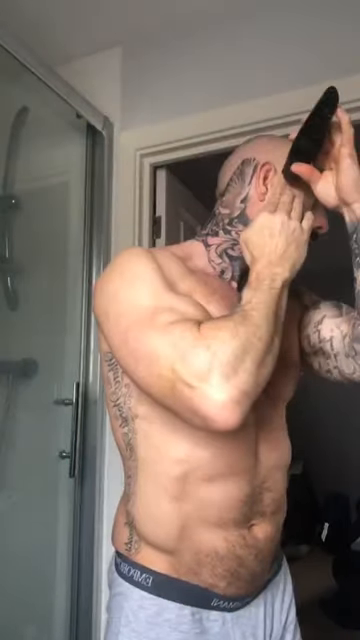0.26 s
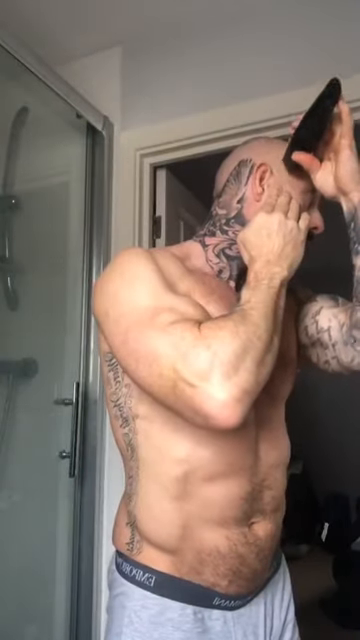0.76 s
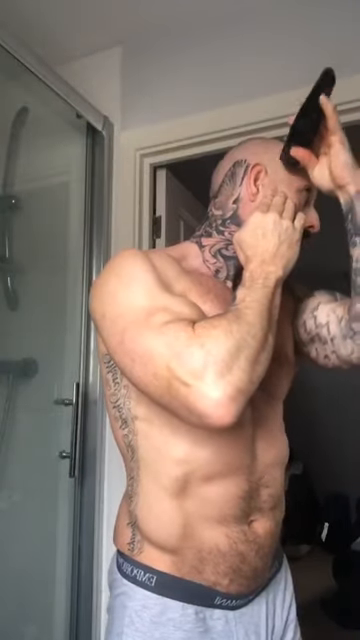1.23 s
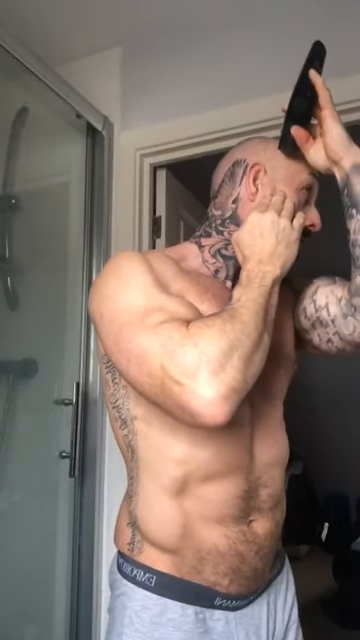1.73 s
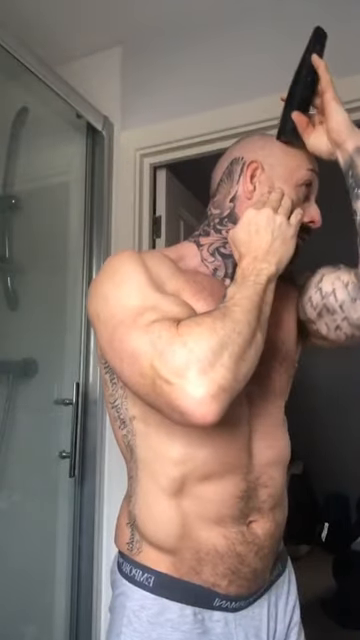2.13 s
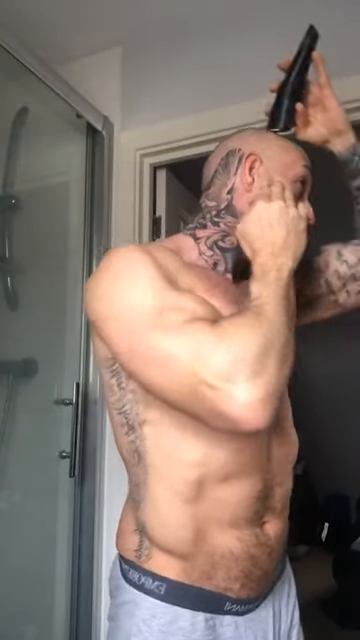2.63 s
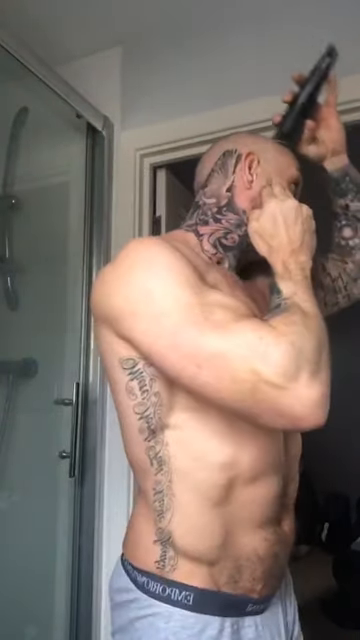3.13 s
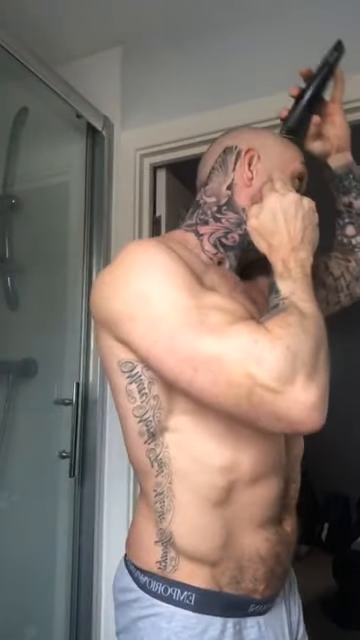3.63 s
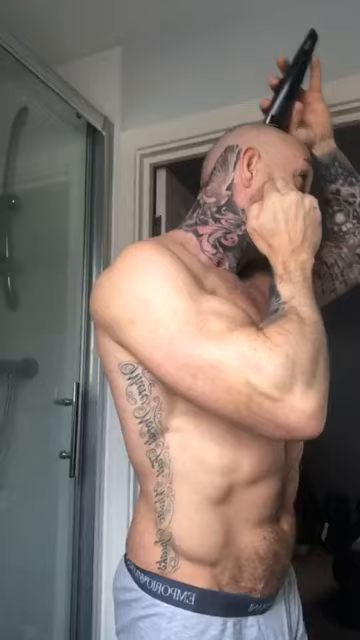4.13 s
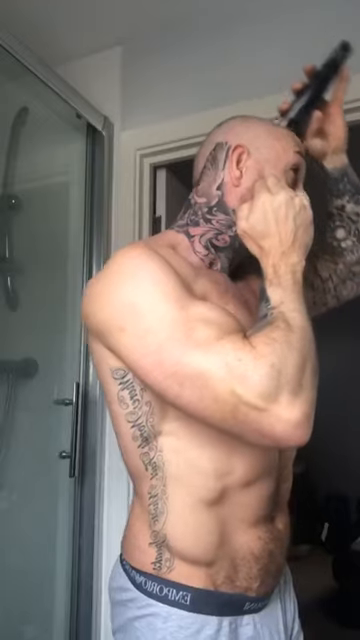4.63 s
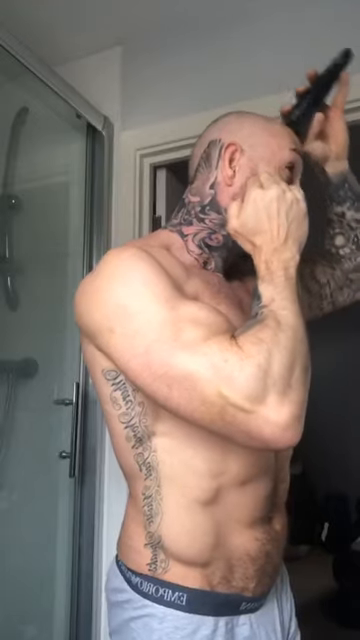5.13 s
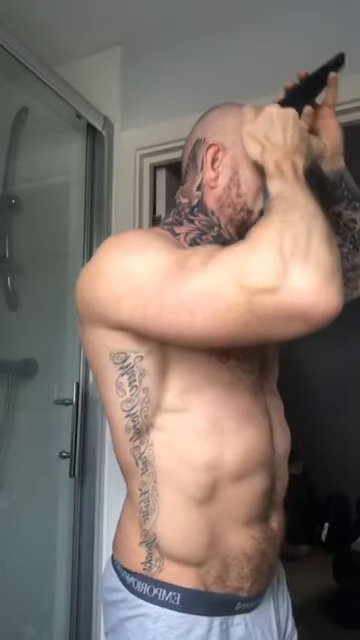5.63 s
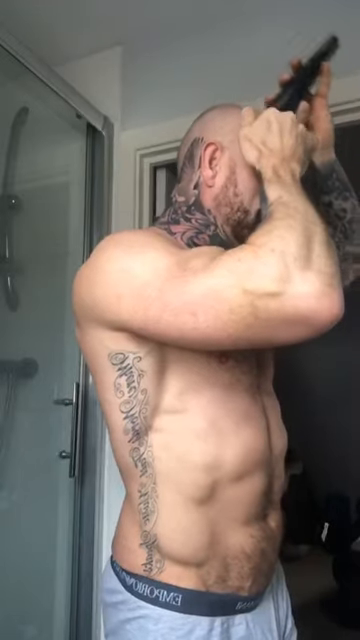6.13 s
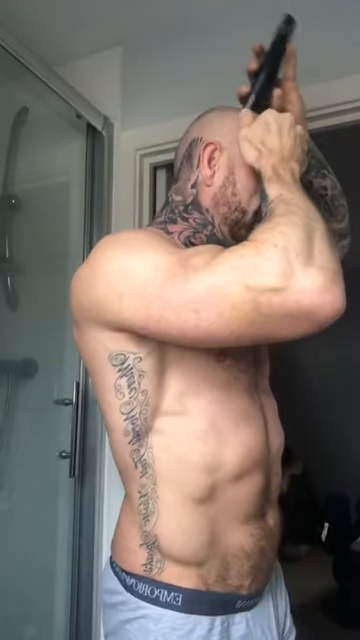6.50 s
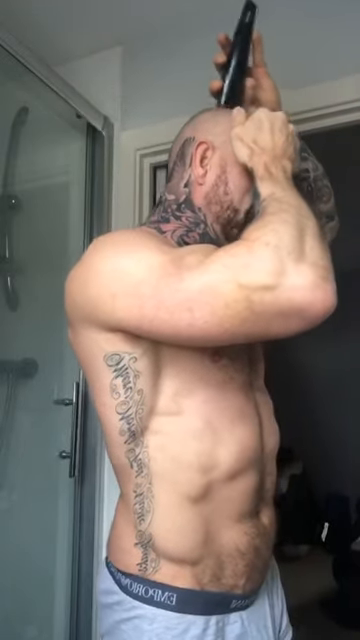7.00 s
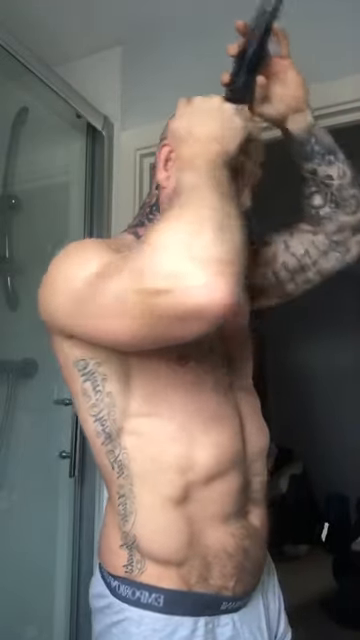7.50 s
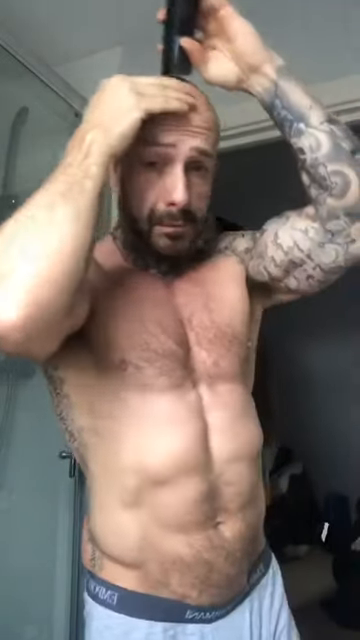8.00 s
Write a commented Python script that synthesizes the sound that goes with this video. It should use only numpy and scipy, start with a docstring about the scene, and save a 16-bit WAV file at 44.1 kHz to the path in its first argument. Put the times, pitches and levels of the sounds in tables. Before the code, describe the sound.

An electric hair trimmer is already running at the start and buzzes at an even loudness for the whole eight seconds or so. It sits a metre or two from the microphone in a small tiled bathroom with a short echo. The sound combines a motor hum, a whining buzz from the plastic case and a bright hiss from the steel teeth. Two or three times a second the blade passes over the scalp, and the pitch sags slightly, roughens and recovers. The dips are deepest around 1 to 1.5 seconds, lighter from about 4 to 6 seconds, and stronger again from 6.3 to 7 seconds. The tone colour keeps shifting as the trimmer tilts. Very soft, low rubs come near 5.8 to 6.2 seconds and again at 8 seconds. A faint room rumble lies underneath, and the trimmer is still running at the end.

```python
"""Hair trimmer in a tiled bathroom

A rotary-motor trimmer runs over a scalp in a small tiled room, a metre or two from a phone microphone.
Each motor turn repeats the same knocks of cam and blade: a stack of lines on the turn rate, which sags
and roughens when the blade is pressed on. The steel teeth rub in a hiss that pulses twice a turn.
The room rumbles faintly below, and a few soft, low rubs come in the later passes."""
import sys
import numpy as np
from scipy import signal
from scipy.fft import rfft, irfft, next_fast_len
from scipy.io import wavfile
from scipy.ndimage import uniform_filter1d

SR = 44100
rng = np.random.default_rng(int(sys.argv[2]) if len(sys.argv) > 2 else 0)


def inscribe(sig):
    """Save sig as 16-bit PCM at rate SR to the path in sys.argv[1].

    A 1-D sig is mono; a 2-D sig holds one channel per row.
    Samples are clipped to [-1, 1] before scaling.
    """
    pcm = np.round(np.clip(np.atleast_2d(sig).T, -1, 1) * 32767)
    wavfile.write(sys.argv[1], SR, pcm.astype(np.int16))


N = 364089
FREE_SPEED_HZ = 93.46   # turns per second with nothing braking the motor
STEP = 64   # samples between the points of a slow curve


def from_db(db):
    return 10 ** (np.asarray(db) / 20)


def rms_one(x):
    return x / np.sqrt(np.mean(x ** 2) + 1e-20)


def in_time(rows):
    """Rows that begin with a time in seconds become one curve for each further column."""
    times, *columns = np.transpose(rows)
    return [np.interp(np.arange(N) / SR, times, column) for column in columns]


def at_hz(spectrum, hz):
    """Level in dB along rows of (Hz, dB); -90 beyond their ends."""
    points_hz, points_db = np.transpose(spectrum)
    return np.interp(np.log(hz), np.log(points_hz), points_db, -90, -90)


def every_sample(slow):
    return np.interp(np.arange(N) / STEP, np.arange(len(slow)), slow)


def slow_drift(rate_hz):
    """A slow random curve: noise through a double one-pole low-pass; rms 1."""
    pole = np.exp(-2 * np.pi * rate_hz * STEP / SR)
    noise = rng.standard_normal(N // STEP + 1001)
    return rms_one(signal.lfilter([1], [1, -2 * pole, pole * pole], noise)[1000:])


def drift(rate_hz):
    return every_sample(slow_drift(rate_hz))


def slow_bumps(times, heights, rise_s, fall_s):
    """A slow curve that rises and falls smoothly around each moment."""
    after = np.arange(0, N, STEP) / SR - np.array(times)[:, None]
    away = np.clip(np.where(after < 0, -after / rise_s, after / fall_s), 0, 1)
    return np.sum(np.array(heights)[:, None] * np.cos(away * np.pi / 2) ** 2, axis=0)


def bumps(times, heights, rise_s, fall_s):
    return every_sample(slow_bumps(times, heights, rise_s, fall_s))


def coloured(spectrum):
    """Noise shaped by rows of (Hz, dB); rms 1."""
    size = next_fast_len(N)
    hz = np.maximum(np.arange(size // 2 + 1) * SR / size, 1)
    return rms_one(irfft(rfft(rng.standard_normal(size)) * from_db(at_hz(spectrum, hz)), size)[:N])


def motor():
    """Each pass over the scalp brakes the motor. Returns its speed and sag, in turns per second."""
    # Each row: time of deepest load in seconds, main sag in turns per second,
    # build-up in seconds, let-go in seconds.
    passes = [(0.329, 1.532, 0.164, 0.222), (0.709, 1.45, 0.154, 0.2), (1.059, 2.183, 0.108, 0.217),
              (1.463, 2.451, 0.156, 0.241), (1.857, 1.606, 0.101, 0.213), (2.239, 1.351, 0.114, 0.208),
              (2.614, 1.385, 0.14, 0.221), (2.976, 1.362, 0.172, 0.269), (3.376, 1.574, 0.168, 0.298),
              (3.787, 1.5, 0.217, 0.3), (4.145, 0.925, 0.208, 0.278), (4.527, 0.421, 0.204, 0.278),
              (4.936, 0.901, 0.189, 0.3), (5.261, 1.104, 0.19, 0.3), (5.623, 0.418, 0.092, 0.247),
              (5.973, 0.281, 0.138, 0.186), (6.271, 1.74, 0.119, 0.268), (6.619, 1.927, 0.206, 0.284),
              (6.972, 1.504, 0.234, 0.299), (7.261, 0.901, 0.179, 0.183), (7.618, 0.766, 0.248, 0.281),
              (8.029, 0.916, 0.139, 0.3)]
    # The motor between passes. Each row: time in seconds, turns per second.
    unloaded = [(0.0, 92.17), (0.2, 91.63), (1.3, 89.91), (4.0, 90.59), (5.55, 91.28), (6.15, 90.84),
                (6.5, 90.11), (7.3, 90.36), (8.26, 90.88)]
    times, depth, press_s, ease_s = np.transpose(passes)
    bite = .19 * bumps(times, depth, rise_s=.076, fall_s=.076)   # extra sag at the deepest point
    sag = bumps(times, depth, press_s[:, None], ease_s[:, None]) + bite
    return in_time(unloaded)[0] - sag, sag


def roughness(speed):
    """While stubble brakes the blade, the turns stop repeating exactly: 0 clear, 1 all rattle."""
    slowing = uniform_filter1d(-np.gradient(speed) * SR, size=4000, origin=1900)   # lags a little
    return np.clip(.018 * (FREE_SPEED_HZ - speed) + .02 * np.maximum(slowing, 0), .02, .7)


def swell(multiple):
    """One line rings out or fades as the grip and tilt of the case shift: a slow curve in dB."""
    # Each row: time in seconds, multiple of the turn rate, rise in dB, half length in seconds.
    swells = [(0.0, 25, -18, 0.24), (0.04, 52, 13, 0.27), (0.06, 19, -6, 0.55), (0.084, 12, -22, 0.18),
              (0.143, 50, 8, 0.19), (0.264, 22, 11, 0.055), (0.3, 48, 8, 0.25), (0.362, 24, 6.5, 0.16),
              (0.495, 12, 3, 0.23), (0.48, 18, 8, 0.6), (0.505, 22, 10, 0.2), (0.5, 60, 10, 0.15),
              (0.52, 24, -8, 0.1), (0.513, 50, 6, 0.15), (0.54, 46, 6, 0.15), (0.54, 47, 7, 0.22),
              (0.54, 51, 10, 0.2), (0.56, 23, 9, 0.24), (0.56, 54, 4, 0.089), (0.58, 38, 9, 0.1),
              (0.6, 25, 10, 0.27), (0.66, 20, 8, 0.23), (0.72, 24, 5, 0.2), (0.755, 12, 5, 0.22),
              (0.88, 19, 3, 0.14), (0.882, 21, 5, 0.14), (0.905, 15, 4.5, 0.65), (0.9, 22, 4, 0.16),
              (0.902, 25, 16, 0.19), (0.9, 26, 4, 0.2), (0.9, 49, 6, 0.21), (0.9, 50, -1, 0.14),
              (0.92, 54, 4, 0.28), (0.976, 24, 6, 0.092), (1.18, 11, 3, 0.1), (1.2, 20, 12, 0.038),
              (1.21, 24, 10.5, 0.081), (1.257, 51, 1, 0.11), (1.28, 19, 1, 0.12), (1.283, 22, 4, 0.14),
              (1.277, 26, 3, 0.25), (1.42, 29, 11, 0.38), (1.54, 12, 2, 0.6), (1.637, 24, 5.5, 0.099),
              (1.7, 33, 5, 0.37), (1.7, 50, -4, 0.083), (1.702, 54, 7, 0.11), (1.742, 25, 7.5, 0.45),
              (1.88, 24, -2, 0.11), (1.92, 20, 8, 0.87), (2.0, 24, 0.5, 0.42), (2.047, 22, -6, 0.63),
              (2.08, 21, -18, 0.15), (2.28, 15, 8, 0.2), (2.28, 25, 5, 0.73), (2.3, 11, 5, 0.77),
              (2.3, 26, 2, 0.34), (2.318, 24, 4.5, 0.14), (2.32, 28, 2, 0.2), (2.42, 19, 1, 0.47),
              (2.45, 54, 9, 0.074), (2.627, 24, 6.5, 0.2), (2.817, 19, 2, 0.1), (2.82, 22, 2, 0.34),
              (2.82, 23, 8, 0.1), (2.823, 26, 4, 0.14), (2.82, 33, 5.5, 0.37), (2.846, 24, -10, 0.24),
              (2.867, 12, 7.5, 0.077), (2.926, 50, 8, 0.18), (2.997, 19, -26, 0.18), (3.024, 25, -1, 0.38),
              (3.18, 56, -1, 0.2), (3.4, 19, -10, 0.11), (3.457, 12, -0.5, 0.69), (3.54, 50, -3, 0.35),
              (3.6, 56, -1, 0.14), (3.62, 19, 3.5, 0.17), (3.618, 26, 3, 0.14), (3.96, 60, -4, 0.4),
              (3.978, 32, 0, 0.11), (3.987, 19, 6, 0.15), (4.064, 54, 3, 0.48), (4.1, 13, 6, 0.2),
              (4.18, 56, 8, 0.1), (4.32, 23, 0, 0.55), (4.36, 50, -2, 0.11), (4.5, 13, 6, 0.17),
              (4.303, 32, 7.5, 0.85), (4.56, 56, -7, 0.64), (4.6, 12, -5, 0.41), (4.72, 50, 8, 0.12),
              (4.74, 40, 10, 0.14), (4.76, 24, -9, 0.088), (4.88, 13, 7, 0.16), (4.98, 58, 6, 0.21),
              (5.02, 19, 5, 0.13), (5.098, 24, -9, 0.4), (5.098, 32, 8, 0.22), (5.096, 50, 7, 0.14),
              (5.2, 12, -13, 0.14), (5.228, 13, 11, 0.11), (5.24, 22, 5, 0.86), (5.24, 54, 4, 0.35),
              (5.438, 48, 7, 0.14), (5.427, 50, 6, 0.056), (5.5, 27, 6, 0.11), (5.527, 24, -14, 0.097),
              (5.602, 56, 7, 0.07), (5.85, 25, 8, 0.8), (5.643, 13, 11, 0.099), (5.68, 50, 6, 0.3),
              (5.6, 18, 7, 0.99), (5.742, 60, 9, 0.28), (5.782, 12, -11, 0.8), (5.78, 58, 1, 0.36),
              (5.8, 24, -8, 0.1), (5.94, 22, -7, 0.37), (5.984, 24, 4, 0.098), (5.996, 26, -13, 0.5),
              (6.04, 11, -19, 0.49), (6.06, 13, 5.5, 0.44), (6.06, 20, -15, 0.24), (6.12, 56, 1, 0.14),
              (6.42, 21, 6, 0.18), (6.443, 19, -4, 0.4), (6.44, 51, -3, 0.14), (6.44, 54, -5, 0.11),
              (6.46, 20, 14, 0.2), (6.64, 23, 4.5, 0.73), (6.64, 24, -11, 0.23), (6.826, 24, 4, 0.084),
              (6.82, 50, -14, 0.16), (6.86, 36, 5, 0.16), (7.0, 23, -4, 0.09), (7.0, 35, 8, 0.44),
              (7.06, 21, 4.5, 0.42), (7.126, 20, 12, 0.41), (7.28, 22, 3, 0.25), (7.283, 56, 10, 0.074),
              (7.28, 60, 4, 0.12), (7.52, 24, -1.5, 0.31), (7.515, 32, 8, 0.17), (7.54, 15, 9, 0.14),
              (7.66, 50, 11, 0.082), (7.78, 54, -2, 0.2), (7.8, 42, 4, 0.16), (7.84, 19, -18, 0.16),
              (7.88, 12, 4, 0.17), (7.94, 14, 9, 0.55), (7.998, 21, 4, 0.14), (8.08, 24, -6, 0.16),
              (8.173, 26, 8, 0.11), (8.2, 48, 10, 0.08), (8.22, 25, 13, 0.55), (8.22, 50, 8, 0.35)]
    rows = [row for row in swells if row[1] == multiple]
    if not rows:
        return np.zeros(N // STEP + 1)
    times, _, rise_db, half_s = np.transpose(rows)
    half_s = np.maximum(half_s, .05)[:, None]
    return slow_bumps(times, rise_db, half_s, half_s)


def lines(turn, multiples, wander_db, wander_hz, slip_rad):
    """Multiples of the turn rate, each fading now and then and slipping in phase on its own; rms 1."""
    turn = turn % (2 * np.pi)
    stack = np.zeros(N)
    for k, db in multiples:
        gain = every_sample(from_db(db + swell(k) - wander_db * slow_drift(wander_hz) ** 2))
        phase = every_sample(rng.uniform(0, 2 * np.pi) + slip_rad * slow_drift(wander_hz))
        stack += gain * np.sin(k * turn + phase)
    return rms_one(stack)


def reversals(turn, depth, uneven):
    """A pulsing gain: the blade reverses twice a turn, one side harder than the other."""
    return rms_one(np.exp(depth * np.cos(2 * turn) + uneven * np.cos(turn + .28)))


def case(turn, rough, buzz_db, drone_db, whine_db):
    """The plastic case buzzes, drones and whines on the turn rate, and rattles when the run is rough."""
    # Low, middle and high lines of the case. Each row: multiple of the turn rate, relative level in dB.
    buzz = [(6, -32), (11, 3.5), (12, 4), (13, 3), (14, -4), (15, 1), (16, -9)]
    drone = [(18, -7), (20, -2.3), (21, 0), (22, 1.5)]
    whine = [(23, 6), (25, 3.3), (26, 7.5), (27, -2.5), (28, 1.5)]
    # The low and the high rattle. Each row: frequency in Hz, relative noise density in dB.
    low_spectrum = [ (300, -101), (330, -18.5), (430, -2), (520, -15), (750, -7), (870, -1), (1050, 2),
                    (1200, 1), (1330, -4), (1440, -14), (1560, -8), (1650, -72), (1900, -45)]
    high_spectrum = [(1460, -7), (1540, -9), (1650, -10), (2100, -6.5), (2350, -8.5), (2560, -8),
                     (2750, -40), (3000, -55)]
    groups = (buzz, buzz_db - 2.5), (drone, drone_db - 5.5), (whine, whine_db - 3.5)
    tones = sum(from_db(db) * lines(turn, multiples, wander_db=1.6, wander_hz=4, slip_rad=.3)
                for multiples, db in groups)
    low_rattle = from_db(buzz_db + 1) * coloured(low_spectrum)
    high_rattle = from_db((drone_db + whine_db) / 2 + .8) * coloured(high_spectrum)
    rattle = (low_rattle + high_rattle) * reversals(turn, depth=.081, uneven=.055)
    return np.sqrt(1 - rough) * tones + np.sqrt(rough) * rattle


def blade(turn, rough, level_db):
    """Steel teeth knock alike on each turn and rub in a hiss; a rough run blurs the knocks into noise."""
    # The colour of the teeth. Each row: frequency in Hz, relative density in dB.
    teeth_spectrum = [(2300, -20), (2650, -8), (2870, -5), (3290, -5.5), (4200, -4.5), (4550, -1),
                      (5000, -2), (5800, -4), (7630, -0.5), (9070, -6), (9400, -8.5), (10100, -22),
                      (10500, -15), (11300, -12), (11800, -16), (12500, -17), (14200, -25.5)]
    multiples = np.arange(29, 110)
    hz = multiples * FREE_SPEED_HZ
    knock_db = at_hz(teeth_spectrum, hz) - 4 * (hz / 9000) ** 2   # the top repeats less exactly
    odd_db = -1.5 * (multiples % 2)   # the two reversals are much alike, which weakens odd multiples
    clear = lines(turn, zip(multiples, knock_db + odd_db), wander_db=6.5, wander_hz=5.5, slip_rad=.9)
    blurred = coloured(np.c_[hz, knock_db])
    blur = np.clip(1.5 * rough, 0, .9)
    knocks = np.sqrt(1 - blur) * clear + np.sqrt(blur) * blurred
    hiss = coloured(teeth_spectrum) * reversals(turn, depth=.1, uneven=.061)
    return from_db(level_db) * (from_db(-.8) * knocks + from_db(-6.5) * hiss)


def blade_tilt(x, wander_db, wander_hz):
    """Each band swells and sinks on its own as the blade tilts against the skin."""
    # Each entry: a band edge in Hz. Nothing below the first edge passes.
    edges_hz = (2600, 2950, 3350, 3800, 4250, 4700, 5200, 5800, 6500, 7300, 8300, 10000, 12000, 22050)
    size = next_fast_len(N)
    spectrum, hz = rfft(x, size), np.arange(size // 2 + 1) * SR / size
    bands = (irfft(spectrum * ((hz >= low) & (hz < high)), size)[:N]
             for low, high in zip(edges_hz, edges_hz[1:]))
    return sum(from_db(wander_db * drift(wander_hz)) * band for band in bands)


def hum(turn, sag, drone_db, whine_db):
    """The motor's hum: nine clean lines that stand out, most of them sinking under load."""
    # The hum between passes. Each row: time in seconds, then base levels in dB of the
    # 3rd, 5th, 10th, 7th, 8th, 9th and 17th multiples.
    hum_levels = [(0, -56, -56, -76, -69, -71, -56, -47), (0.3, -55.5, -54.5, -49, -64, -64, -47.5, -50),
                  (0.9, -58.5, -50.5, -58, -62, -57, -49, -49), (1.5, -61, -54, -44.5, -66, -68, -53, -49),
                  (2.1, -61, -56, -46.5, -67, -67, -53, -49), (2.5, -60, -53, -44, -68, -65, -52, -47.5),
                  (3.2, -61, -50, -42, -64, -75, -51, -54), (4, -61.5, -48.5, -42, -61, -61, -54, -52.5),
                  (4.5, -62.5, -49.5, -42.5, -65, -67, -52, -45.5),
                  (4.9, -62, -51.5, -44, -58, -66, -46, -49), (5.3, -62, -52.5, -37.5, -54, -66, -47, -49),
                  (5.5, -59.5, -58.5, -48, -54.5, -67, -48.5, -52.5),
                  (6.1, -59, -56, -49.5, -55, -69, -47, -44.5),
                  (6.4, -68, -50, -64, -59, -55.5, -54, -52.7),
                  (6.9, -66, -49.5, -46, -68, -57.5, -60, -52),
                  (7.3, -71, -48, -50, -62, -55.5, -48.5, -57),
                  (7.7, -80, -53, -46, -71, -64.5, -40.5, -57.5), (7.9, -65, -57, -41, -54, -68, -55, -52),
                  (8.26, -70, -57, -43, -56, -57, -49, -56)]
    # Brief dips. Each row: time in seconds, change in dB of the 3rd multiple and of the 5th.
    dropouts = [(.6, 1, -7), (.99, 4, -7), (1.12, -5, -2), (1.51, -8, -7), (1.92, -5, -7), (2.3, -3, -18),
                (2.62, -5, -1.5), (6.63, -3, -7)]
    # Each entry, line by line: multiple of the turn rate; dB per turn a second of sag; wander in dB.
    multiples = (3, 5, 10, 7, 8, 9, 17, 19, 24)
    sag_slopes = (-1, -0.3, -7, -13, -1.2, -8.5, 0.46, -3, -1)
    wanders_db = (.8, .8, 1, 2, 1.8, 1, 1.8, 1.5, 1.5)
    third_db, fifth_db, *others_db = in_time(hum_levels)
    times, third_dip_db, fifth_dip_db = np.transpose(dropouts)
    third_db += bumps(times, third_dip_db, rise_s=.14, fall_s=.14)
    fifth_db += bumps(times, fifth_dip_db, rise_s=.14, fall_s=.14)
    # the 19th and 24th multiples follow the drone and the whine
    levels_db = [third_db, fifth_db, *others_db, drone_db - 7.5, whine_db - 6.5]
    sound = np.zeros(N)
    for k, base_db, slope, wander_db in zip(multiples, levels_db, sag_slopes, wanders_db):
        flutter_db = wander_db * drift(rate_hz=12.3) + 1.2 * drift(rate_hz=40)
        db = base_db + every_sample(swell(k)) + slope * sag + flutter_db
        sound += np.sqrt(2) * from_db(db) * np.sin(k * turn + rng.uniform(0, 2 * np.pi))
    return sound


def bathroom(x, t60_s):
    """Dense echoes off hard walls; the tail wraps round, so the room is already ringing at the start."""
    size = next_fast_len(N)
    t = np.arange(SR) / SR
    echoes = rng.standard_normal(SR) * from_db(-60 * t / t60_s) * (t > .004)
    echoes /= np.sqrt(np.sum(echoes ** 2))
    return irfft(rfft(x, size) * rfft(echoes, size), size)[:N]


def room_rumble():
    """Faint, low room tone under the trimmer."""
    # Each row: time in seconds, level in dB.
    levels = [(0, -61), (1.8, -63), (2.6, -62), (5, -62), (6.6, -63), (7.5, -61.5), (8.26, -59)]
    # Each row: frequency in Hz, relative noise density in dB.
    spectrum = [(11, -35), (18, -3.5), (59, 7.5), (114, -3), (144, -1.5), (177, -7), (240, -0.5), (310, -6),
                (530, -120)]
    return from_db(in_time(levels)[0]) * coloured(spectrum)


def rubs():
    """Low, soft rubbing: short swells of noise in a narrow band."""
    # Each row: time of the peak in seconds, level in dB, band centre in Hz.
    touches = [(5.77, -63, 145), (6.06, -54.5, 400), (6.16, -54.5, 242), (8.05, -61, 378)]
    sound = np.zeros(N)
    for peak_s, db, hz in touches:
        band = coloured([(hz / 1.25, -20), (hz, 0), (hz * 1.25, -20)])
        sound += from_db(db) * bumps([peak_s], [1], rise_s=.18, fall_s=.18) * band
    return sound


def scene():
    """The trimmer and the room in mono, from a metre or two away."""
    # What reaches the microphone as hand and head turn. Each row: time in seconds,
    # then base levels in dB of blade, buzz, drone and whine.
    facing = [(0, -38, -40.5, -44, -42), (.3, -36, -41.5, -37.5, -42), (1.03, -35, -40, -37.5, -41),
              (2, -36, -43, -40, -37.5), (2.75, -36, -42, -36.5, -39.5), (3.1, -35.5, -42, -39, -41.5),
              (4.2, -35.5, -42.5, -38, -40.5), (5.5, -36.5, -43, -39.5, -40.5),
              (6.15, -35.5, -41.5, -38.5, -38.5), (6.4, -35, -43, -40.5, -40),
              (7.4, -36, -42.5, -39, -40.5), (8.26, -36.5, -40.5, -38, -42)]
    # How load shifts those four levels. Each entry: dB per turn a second of sag.
    sag_slopes = (-0.45, -0.07, -0.14, 0.72)
    speed, sag = motor()
    turn = 2 * np.pi * np.cumsum(speed) / SR   # shaft angle in radians
    rough = roughness(speed)
    blade_db, *case_db = (db + slope * sag for db, slope in zip(in_time(facing), sag_slopes))
    buzz_db, drone_db, whine_db = (db + .7 * drift(rate_hz=15) for db in case_db)
    trimmer = case(turn, rough, buzz_db, drone_db, whine_db)
    trimmer += blade_tilt(blade(turn, rough, blade_db), wander_db=1.5, wander_hz=26)
    echoes = from_db(-10) * bathroom(trimmer, t60_s=.35)
    return (trimmer + echoes + room_rumble() + hum(turn, sag, drone_db, whine_db) + rubs())[None]


def record(dry):
    """The top of the treble is cut off steeply."""
    cutoff_hz = 14120
    return signal.sosfilt(signal.ellip(12, .5, 60, cutoff_hz, fs=SR, output="sos"), dry)


dry = scene()
out = record(dry)
inscribe(out)
```